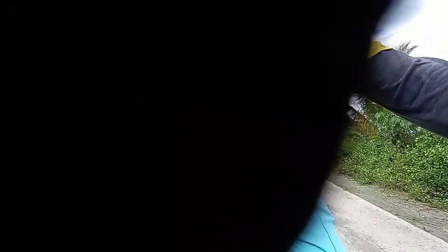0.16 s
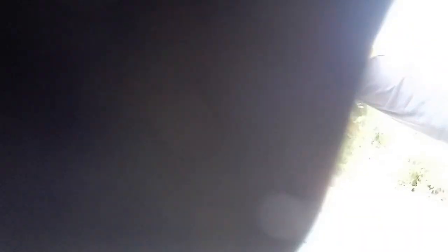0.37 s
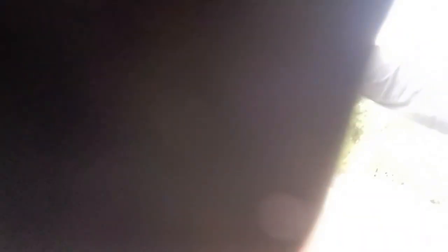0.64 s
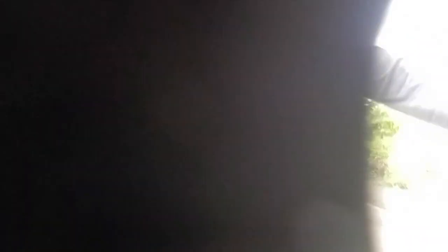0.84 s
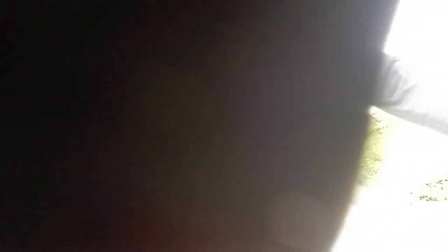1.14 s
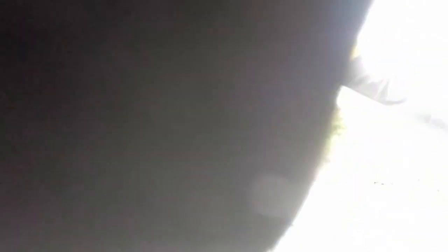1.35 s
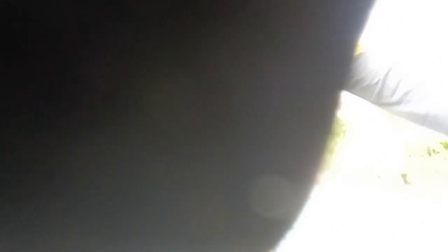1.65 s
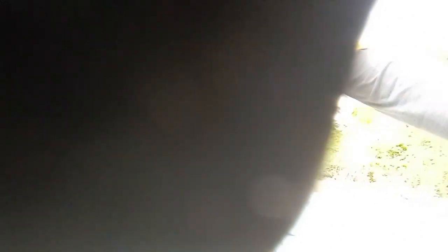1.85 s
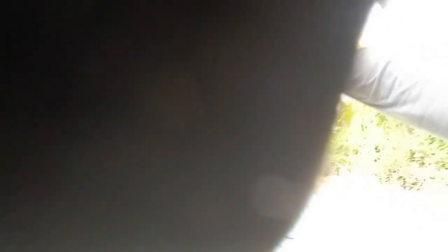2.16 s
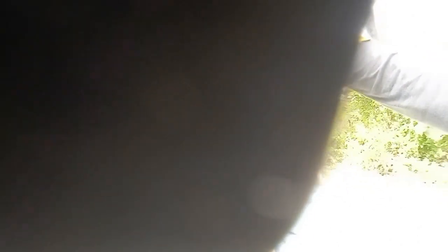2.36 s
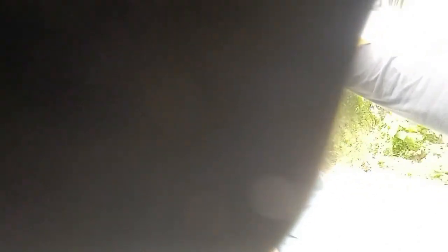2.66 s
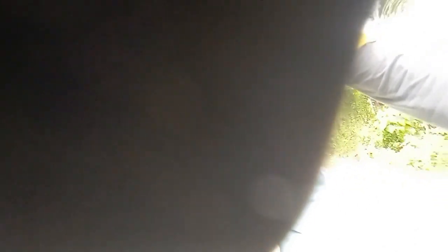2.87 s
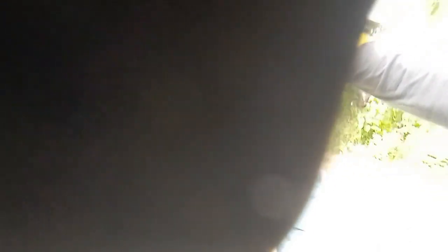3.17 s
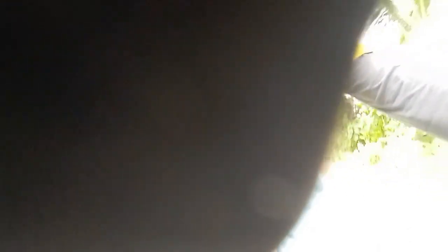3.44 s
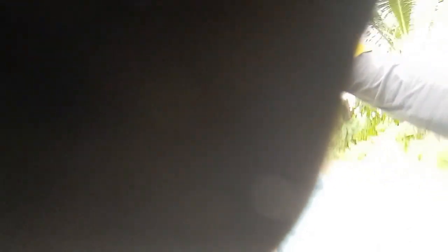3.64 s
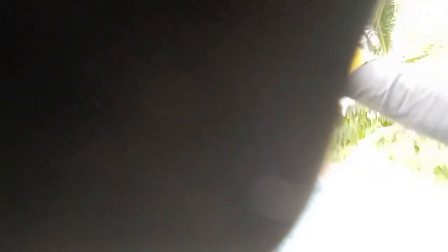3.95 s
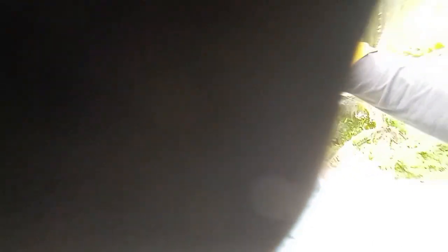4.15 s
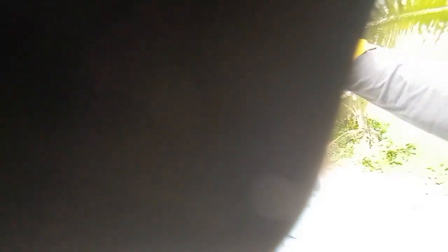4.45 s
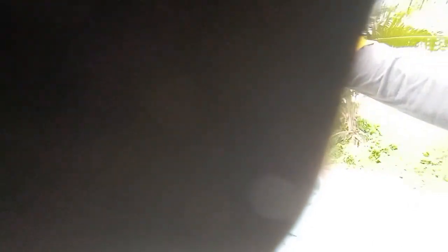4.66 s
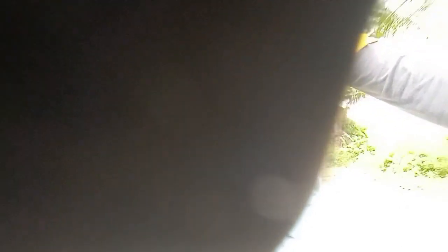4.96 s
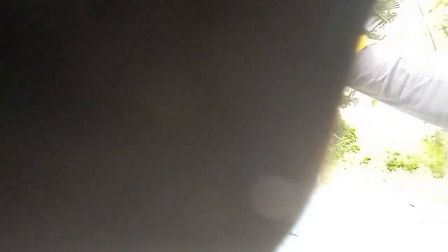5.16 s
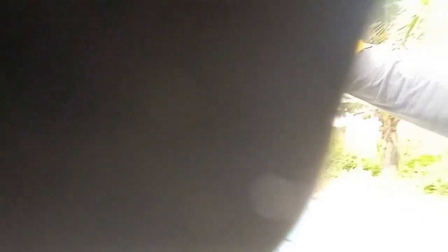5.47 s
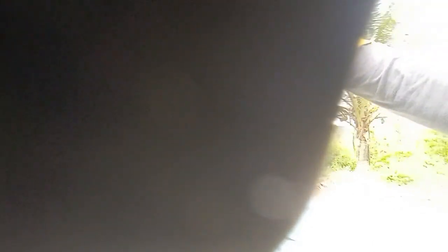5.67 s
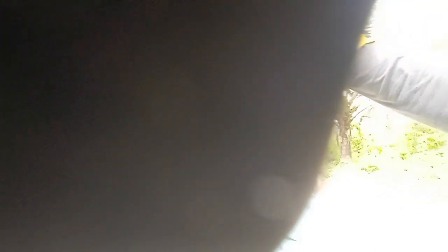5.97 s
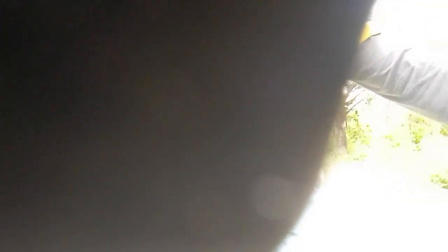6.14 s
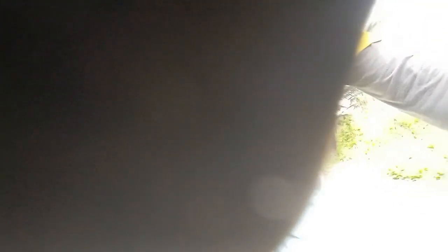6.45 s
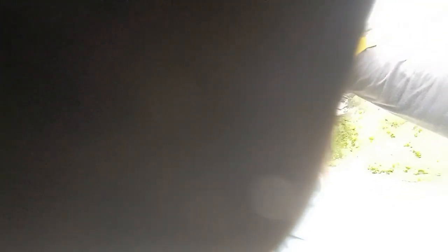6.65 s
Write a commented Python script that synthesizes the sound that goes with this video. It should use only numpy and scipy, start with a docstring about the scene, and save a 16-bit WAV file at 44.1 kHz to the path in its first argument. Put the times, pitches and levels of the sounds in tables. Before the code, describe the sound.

Close, dry handling noise dominates: sharp snaps and gritty chafing of fingers on a camera case. Beneath it a coasting bicycle ticks rapidly, slightly speeding up then slowing, with tyre roll, a humming drone and soft low wind puffs. After the rubbing lets go, a brief hollow swish passes and the quiet clicking continues outdoors.

```python
"""Coasting bicycle, heard from the handlebar

A bicycle coasts along a concrete road, speeding up and slowing, with a camera held at the handlebar.
The freewheel pawl ticks over worn teeth: noise bursts through ringing filters, timed by the wheel speed.
The tyres hiss and roll as coloured noise, and the ride makes the camera case drone in a narrow band.
A hand chafes (dense tiny snaps) and crackles (short wavelets) on the case; wind puffs are low noise.
One soft thump and one hollow swish of gliding resonances pass by."""
import sys
import numpy as np
from scipy import signal
from scipy.fft import rfft, irfft
from scipy.io import wavfile
from scipy.ndimage import uniform_filter1d

SR = 44100
rng = np.random.default_rng(int(sys.argv[2]) if len(sys.argv) > 2 else 0)


def transcribe(signal):
    """Save signal, clipped to [-1, 1], as a 16-bit WAV file at the path in sys.argv[1]."""
    frames = np.atleast_2d(signal).T
    limited = np.clip(frames, -1, 1)
    pcm = np.round(limited * 32767).astype(np.int16)
    wavfile.write(sys.argv[1], SR, pcm)


N = 300321
T = np.arange(N) / SR  # seconds
CUTOFF_HZ = 16300
FIRST_DROP_TEETH = .973  # teeth travelled before the first tick
RUB_PEAK_SHARE = .3  # how far into a slip it is loudest

# Levels in the tables are before the trims and chance that the functions add.
# Spectra are relative: each is scaled to unit energy or rms before use.

# Steady chafing of the hand, which tightens and then lets go. Each row: time in seconds, level in dB.
CHAFE_LEVEL = [(0, -51), (.55, -49), (1.05, -48.5), (1.35, -44), (2.1, -44.5), (2.72, -46.5), (3.0, -44.5),
               (3.25, -35.5), (3.7, -35.5), (4.08, -33), (4.45, -38), (5.04, -40.5), (5.1, -52),
               (5.36, -60), (5.7, -58), (6.08, -69), (6.81, -65.5)]
# Single slips of the hand. Each row: start in seconds, length in seconds, level in dB.
RUBS = [(1.3, 0.089, -43), (3.03, .07, -42), (3.11, .06, -37), (3.21, .26, -30.5), (3.5, .06, -32.5),
        (4.68, .09, -33), (5.13, .11, -39.5), (5.24, .09, -43.5), (5.39, 0.17, -42), (5.54, .15, -36),
        (5.75, .11, -49), (5.865, .14, -39)]
# Spectrum of the chafing. Each row: frequency in Hz, density in dB per Hz.
CHAFE_COLOUR = [(470, -35), (800, -19.5), (940, -21), (1070, -1.5), (1200, -7.5), (1345, 3.5), (1520, -4.5),
                (1950, -5), (2350, -1.5), (2680, 2.5), (3200, -3.5), (3840, -1), (4400, -3), (4900, -9.5),
                (6000, -12), (7800, -18.5), (9500, -40), (12000, -31), (16000, -43)]
# How much the rustle and the rolling swirl in colour. Each row: time in seconds, depth in dB.
SWIRL_DEPTH = [(0, 3), (2.8, 1.5), (3.3, 1), (4.7, 2), (5.2, 3), (6, 8), (6.2, 6), (6.8, 5)]

# Rolling noise of the tyres on the changing concrete. Each row: time in seconds, level in dB.
ROLL_LEVEL = [(0, -57.5), (.26, -63), (.42, -56), (.52, -57), (.85, -55), (1.08, -59.5), (1.38, -50.5),
              (1.7, -53.5), (2.65, -49), (3.3, -50), (3.48, -50), (4.05, -50), (4.9, -51), (5.02, -61),
              (5.18, -58), (5.7, -59), (6.3, -62), (6.81, -71)]
# Rough patches of road. Each row: start in seconds, length in seconds, level in dB.
JOLTS = [(0.02, 0.19, -52), (.67, 0.12, -47), (.95, .07, -52), (2.49, 0.1, -48), (4.0, 0.073, -44),
         (4.56, .05, -47), (4.69, 0.1, -50.5), (5.42, 0.065, -57), (5.59, 0.075, -48), (5.77, .07, -47.5),
         (5.98, 0.088, -50.5)]
# The case's drone. Each row: time in seconds, level in dB.
DRONE_LEVEL = [(0, -52.5), (.55, -56.5), (.88, -62), (1.14, -51), (1.45, -48), (1.75, -52), (2.65, -44.5),
               (3.15, -49), (3.35, -54), (4.05, -49), (4.95, -51), (5.09, -61), (5.3, -47), (5.7, -52.5),
               (5.92, -72), (6.3, -59), (6.6, -76), (6.81, -59)]
# Spectra of the rolling and of the tyre hiss. Each row: frequency in Hz, density in dB per Hz.
ROLL_COLOUR = [(90, -30), (150, -3.5), (200, -7.5), (255, 7.5), (300, 1.5), (400, 1.5), (450, 0),
               (500, 3.5), (570, 0), (667, 6), (730, -8), (794, 3), (930, -10), (1100, -4), (1350, 4),
               (1800, -28)]
TYRE_COLOUR = [(30, -25), (120, -6), (300, 0), (500, -12), (950, -12), (1200, 3), (1350, 3), (1550, 5),
               (2700, -3), (4500, -35), (6600, 10), (9500, -42), (12000, -3), (14600, 4.5), (16000, -34)]

# Puffs of wind at the microphone. Each row: start in seconds, length in seconds, level in dB.
GUSTS = [(0.73, 0.081, -55), (1.092, 0.033, -54), (1.31, 0.07, -47), (2.377, 0.053, -48),
         (2.47, 0.09, -51.5), (3.038, 0.035, -51), (3.096, 0.049, -56), (3.149, 0.033, -54),
         (3.52, 0.125, -50), (3.678, 0.1, -47.5), (3.855, 0.071, -53), (4.419, 0.12, -50.5),
         (4.745, 0.067, -51), (5.014, 0.092, -54), (5.174, 0.083, -48.5), (5.299, 0.043, -51),
         (5.389, 0.13, -53), (5.513, 0.17, -48), (5.72, 0.047, -51), (5.858, 0.054, -52),
         (6.16, 0.12, -51.5), (6.35, 0.055, -51)]
# Spectrum of the wind. Each row: frequency in Hz, density in dB per Hz.
WIND_COLOUR = [(15, -15), (35, -22), (55, -3.5), (72, 5), (100, 0.5), (150, -9.5), (250, -24), (500, -34)]

# Wheel speed. Each row: time in seconds, teeth passing per second.
TOOTH_RATE = [(0.0, 32.066), (0.5, 32.748), (1.0, 34.439), (1.5, 36.199), (2.1, 37.332), (2.7, 39.229),
              (3.3, 39.976), (3.9, 39.986), (4.5, 38.574), (5.2, 37.818), (5.8, 36.168), (6.3, 34.62),
              (6.81, 33.289)]
# One turn of the 20-tooth ratchet, each tooth worn differently. Each row: high ring in dB, low ring in dB.
TOOTH_WEAR = [(1.5, 0), (-0.7, -1), (0.5, 2.5), (-0.3, -1), (0, 1.0), (2, 0.0), (-0.9, 0), (1, 1.5),
              (0.2, 2.5), (-0.7, -1), (0, -1.5), (-1.5, 2), (0.5, 0), (0.2, 1), (1.5, -1), (1, -0.3),
              (-0.5, 0.5), (2.5, 2.5), (1, 1.5), (0.5, -2.5)]
# Ticks where the pawl drops hard. Each row: time in seconds, force in dB over a usual tick.
HARD_TICKS = [(0.584, 6), (0.882, 4), (0.912, 3), (1.057, 5.5), (1.086, 5), (1.143, 7), (1.314, 4),
              (1.646, 6.8), (1.701, 9), (2.528, 5), (2.707, 5.4), (2.784, 6), (3.263, 5), (3.288, 6),
              (3.538, 7.5), (3.588, 6.5), (4.039, 4.9), (4.293, 5.4), (6.31, 3), (6.339, 6), (6.484, 5),
              (6.721, 4.1), (6.781, 6)]
# Spectra of the pawl's low ring, its high ring and its low and high squeaks as it slides up a tooth.
# Each row: frequency in Hz, density in dB per Hz.
PAWL_LOW = [(4000, -62), (5500, -31), (5950, -5.5), (6170, -19), (6380, -0.5), (6560, 2.5), (6850, -3.5),
            (7200, -12), (7520, -14), (7850, -16.5), (8500, -19.5), (9000, -27), (9500, -61), (11500, -30)]
PAWL_HIGH = [(9500, -30.5), (11400, -46), (12200, -23), (12850, -5.5), (13600, -8.5), (14350, 6.5),
             (14750, 2.5), (15200, -7), (15700, -16), (16100, -59), (16600, -45)]
PAWL_SLIDE = [(900, -38), (1350, -19), (1750, -5), (2000, -9), (2120, 8.5), (2270, -13.5), (2450, -21),
              (3500, -39), (6500, -29), (9000, -52)]
PAWL_SQUEAK = [(2500, -20.5), (3800, -13), (4350, -4), (4500, -7), (4720, 2.5), (4980, -20), (5220, -1),
               (5500, -12.5), (6500, -13), (9000, -49)]
# How dry the pawl slides. Each row: time in seconds, low squeak in dB, high squeak in dB.
DRYNESS = [(0, -48.5, -45), (.9, -46, -45.5), (1.3, -45, -44), (2.6, -46, -47), (5.6, -50.5, -48.5),
           (6.0, -59.5, -62), (6.81, -60, -67)]
# Short runs of teeth that squeal.
# Each row: start in seconds, length in seconds, low squeak in dB, high squeak in dB.
SQUEALS = [(.17, .03, -38, -46), (.44, .16, -43, -45), (1.04, .12, -41.5, -43.5), (5.76, .08, -46.5, -58),
           (6.33, .08, -46, -69), (6.5, .08, -67, -54.5), (6.615, .03, -47, -64)]

# Loud cracks of the grip on the case. Each row: time in seconds, peak in dB, nominal brightness in Hz.
CRACKS = [(0.1376, -6.5, 5200), (0.5846, -18, 3100), (1.1305, -18.5, 3680), (1.4789, -11.5, 3100),
          (1.8648, -16, 4500), (1.8692, -10, 2710), (1.873, -13, 3560), (2.4397, -14.5, 4060),
          (2.4548, -14.5, 3300), (2.5096, -19.5, 1980), (2.8438, -15.5, 3900), (3.1358, -12, 3320),
          (3.2648, -9.5, 3030), (3.3358, -9.5, 3220), (3.3837, -10.5, 4000), (3.5127, -11.5, 3750),
          (3.6601, -14, 3200), (3.7768, -6, 2870), (3.8508, -10, 3160), (4.4219, -14.5, 4330),
          (4.5492, -9, 3620), (4.695, -8.5, 3700), (4.7177, -17, 3600), (4.9245, -21, 4470),
          (5.0403, -21, 3700), (5.1445, -16, 3560), (5.1779, -26, 3620), (5.2853, -22, 4120),
          (5.398, -20, 3100), (5.583, -21.5, 3620), (5.6585, -15, 4370), (5.8768, -21.5, 3370),
          (6.7542, -31.5, 4500)]
# Duller knocks on the case. Each row: time in seconds, peak in dB.
KNOCKS = [(1.009, -26.5), (1.869, -21), (2.508, -25), (3.309, -24.5), (3.511, -30), (3.776, -30),
          (3.961, -22.5), (4.573, -21), (4.692, -29)]
# Case resonances. Each row: nominal frequency in Hz, level in dB, time to fall 60 dB in seconds.
CASE_MODES = [(341, -42, .12), (686, -43, 0.038), (840, -17, 0.033), (1120, -5, 0.038), (1330, -0.5, 0.046),
              (1850, 2.5, 0.0041), (2560, 6, 0.013)]

# A short hollow swish.
# Each row: time in seconds, level in dB, lower resonance in Hz, upper resonance in Hz.
SWISH = [(5.85, -78, 520, 1397), (5.89, -58, 567, 1370), (5.95, -43.5, 680, 1310), (6.02, -58, 770, 1216),
         (6.06, -61, 660, 1190), (6.1, -80, 680, 1220)]


def amp(db):
    """Decibels to gain."""
    return 10 ** (np.asarray(db) / 20)


def unit(x):
    """Scales to rms 1."""
    return x / np.sqrt(np.mean(x ** 2) + 1e-20)


def curve(rows, axis=1):
    """One column of a table, joined by lines in time."""
    rows = np.asarray(rows)
    return np.interp(T, rows[:, 0], rows[:, axis])


def add(mix, s, sound):
    """Mixes a sound in at time s."""
    part = mix[max(round(s * SR), 0):][:len(sound)]
    part += sound[:len(part)]


def response(points, size=4096):
    """Causal (minimum-phase) impulse response of a spectrum, energy 1."""
    hz, db = np.transpose(points)
    bins_hz = abs(np.fft.fftfreq(size, 1 / SR)) + 1
    log_gain = np.log(amp(np.interp(np.log(bins_hz), np.log(hz), db)))
    ring = np.fft.ifft(np.exp(np.conj(signal.hilbert(log_gain)))).real[:size // 2]
    return ring / np.linalg.norm(ring)


def coloured(x, points):
    """Gives x a spectrum, at rms 1."""
    return unit(signal.oaconvolve(x, response(points))[:N])


def wander(hz):
    """Slow chance up to a rate, rms 1."""
    spectrum = rfft(rng.standard_normal(N))
    return unit(irfft(spectrum * (np.fft.rfftfreq(N, 1 / SR) < hz), N))


def swells(rows, peak_share):
    """Gain over time of (start, length, dB) events, each one smooth rise and fall."""
    gain = np.zeros(N)
    for start, length, db in rows:
        top = start + length * peak_share
        phase = np.interp(T, [start, top, start + length], [0, np.pi / 2, np.pi])
        gain += amp(db) * np.sin(phase)
    return gain


def swirl(x, span_hz=260, span_s=0.043, size=1024):
    """Patches of the spectrum swell and fade."""
    hop = size // 4
    z = signal.stft(x, nperseg=size, noverlap=size - hop)[2]
    bins = max(round(span_hz * size / SR), 1)
    frames = max(round(span_s * SR / hop), 1)
    field = rng.standard_normal(z.shape)
    for _ in range(2):
        field = uniform_filter1d(field, bins, axis=0)
        field = uniform_filter1d(field, frames, axis=1)
    depth_db = np.interp(np.linspace(0, N / SR, z.shape[1]), *np.transpose(SWIRL_DEPTH))
    gain = amp(depth_db * np.minimum(unit(field), 2))
    gain /= np.sqrt(np.mean(gain ** 2, axis=0))  # colour moves, mean power gain does not
    return signal.istft(z * gain, nperseg=size, noverlap=size - hop)[1][:N]


def whistle(hz, width_hz):
    """Noise in a narrow resonance that may move, rms 1."""
    r = np.exp(-np.pi * width_hz / SR)
    noise = rng.standard_normal(N) + 1j * rng.standard_normal(N)
    fuzz = signal.lfilter([1], [1, -2 * r, r * r], noise)
    carrier = np.exp(2j * np.pi * np.cumsum(hz * np.ones(N)) / SR)
    return unit((fuzz * carrier).real)


def grip_db():
    """How hard the hand chafes: its steady hold plus the single slips."""
    return 20 * np.log10(np.hypot(amp(curve(CHAFE_LEVEL)), swells(RUBS, RUB_PEAK_SHARE)))


def chafing():
    """Skin slipping on the case: countless tiny uneven snaps, each with a brief rasp, over a fine hiss."""
    grains_per_s, size_db, largest = 1700, 4.5, 3.4  # size_db times a chance size, capped at largest
    rasp_db, rasp_decay_s, hiss_gain = -22, 0.0034, 0.35
    bite_per_db, bite_hz = 0.023, 1900

    struck = rng.random(N) < grains_per_s / SR
    sizes = amp(size_db * np.minimum(rng.exponential(1, N), largest))
    snaps = struck * sizes * rng.choice([-1, 1], N)
    rasp_power = signal.lfilter([1], [1, -np.exp(-2 / (rasp_decay_s * SR))], snaps ** 2)
    rasp = np.sqrt(rasp_power) * rng.standard_normal(N)
    grains = unit(snaps + amp(rasp_db) * rasp)
    hiss = hiss_gain * rng.standard_normal(N)
    flutter = amp(0.62 * wander(45))
    rustle = swirl(coloured((grains + hiss) * flutter, CHAFE_COLOUR))

    # a firm grip sounds crisp, a light one duller
    pressure_db = grip_db() + 0.96 * wander(10)
    dullness = np.clip(bite_per_db * (np.median(pressure_db) - pressure_db), -1, 1)
    lows = signal.sosfiltfilt(signal.butter(2, bite_hz, fs=SR, output="sos"), rustle)
    return amp(pressure_db) * (rustle + dullness * lows)


def road():
    """Tyres hiss and roll on concrete; vibration keeps the case droning, and rough patches swell roll and drone."""
    roll_db, drone_db, drone_jolt_db, tyre_db = 0.5, -2.0, -2, -56
    drone_hz, drone_width_hz = 333, 30

    jolts = swells(JOLTS, peak_share=0.46)
    rolling = np.hypot(amp(curve(ROLL_LEVEL) + 2.0 * wander(9)), jolts)
    rumble = swirl(coloured(rng.standard_normal(N), ROLL_COLOUR), span_hz=130)
    roll = amp(roll_db) * rolling * rumble
    shaking = np.hypot(amp(curve(DRONE_LEVEL) + drone_db), amp(drone_jolt_db) * jolts)
    drone = shaking * whistle(drone_hz, drone_width_hz)
    hiss = amp(tyre_db + 0.5 * wander(7.5)) * coloured(rng.standard_normal(N), TYRE_COLOUR)
    return roll + drone + hiss


def wind():
    """A light headwind grows with speed; eddies bump the microphone port in soft, low puffs."""
    gust_db, breeze_db, speed_power = 1.0, -69.0, 4
    speed = curve(TOOTH_RATE)
    breeze = amp(breeze_db + 3.0 * wander(8)) * (speed / speed.mean()) ** speed_power
    strength = np.hypot(breeze, amp(gust_db) * swells(GUSTS, peak_share=0.3))
    return strength * coloured(rng.standard_normal(N), WIND_COLOUR)


def squeak_levels(s):
    """Low and high squeak (dB) of the tooth that passes at time s."""
    for start, length, low_db, high_db in SQUEALS:
        if start <= s <= start + length:
            return low_db, high_db
    when, low, high = np.transpose(DRYNESS)
    return np.interp(s, when, low), np.interp(s, when, high)


def freewheel(size=2048):
    """At each tooth the pawl slides up, drops and chatters for a few milliseconds; the hub rings on."""
    high_db, low_db, squeak_trim_db = -40.0, -43.0, -2
    force_spread_db, low_spread_db, squeak_spread_db, hub_spread_db = 1.5, 1.3, 2.5, 5.0
    low_follow, hub_follow = 0.085, 0.97  # dB per dB of force
    hub_db, hub_hz, hub_t60 = -53, 14750, 0.14
    # seconds: the contact starts ahead of the tooth, builds up, chatters, then settles
    lead, attack, chatter, settle = 0.0029, 0.0023, 0.0022, 0.0019
    tail_db, tail_s = -20, 0.028
    slide_lead, slide_width = 0.00078, 0.0047  # seconds
    chatter_spread, detune_hz = 0.24, 75
    before, tick_length = .006, .01  # seconds

    passed = np.cumsum(curve(TOOTH_RATE)) / SR
    times = np.interp(np.arange(FIRST_DROP_TEETH, passed[-1]), passed, T)
    high_wear, low_wear = np.array(TOOTH_WEAR)[np.arange(len(times)) % len(TOOTH_WEAR)].T
    chance = rng.standard_normal((len(times), 7))
    force_db = high_wear + force_spread_db * chance[:, 0]
    for s, db in HARD_TICKS:
        force_db[np.argmin(abs(times - s))] = db

    t = np.arange(size) / SR - before
    since = np.maximum(t + lead, 0)
    sliding = np.exp(-abs(t + slide_lead) / slide_width)
    after = np.arange(0, hub_t60, 1 / SR)
    hub_envelope = amp(-60 * after / hub_t60) * np.minimum(after / chatter, 1)
    hub = hub_envelope * np.sin(2 * np.pi * hub_hz * after)
    spectra = (PAWL_HIGH, PAWL_LOW, PAWL_SLIDE, PAWL_SQUEAK)
    rings = [signal.hilbert(response(part, size=1024)) for part in spectra]

    out = np.zeros(N)
    for tooth, (s, force, luck) in enumerate(zip(times, force_db, chance)):
        # the pawl never lands twice alike: it bounces longer or shorter, and rings a little higher or lower
        bounce_time = since * np.exp(chatter_spread * luck[3])
        bouncing = np.exp(-np.maximum(bounce_time - chatter, 0) / settle)
        bouncing = (bouncing + amp(tail_db) * np.exp(-since / tail_s)) * np.minimum(since / attack, 1)
        detune = np.exp(2j * np.pi * detune_hz * luck[4] * t[:len(rings[0])])
        low_squeak, high_squeak = squeak_levels(s)
        levels = (high_db + force,
                  low_db + low_wear[tooth] + low_follow * force + low_spread_db * luck[1],
                  squeak_trim_db + low_squeak + squeak_spread_db * luck[5],
                  squeak_trim_db + high_squeak + squeak_spread_db * luck[6])
        contacts = (bouncing, bouncing, sliding, sliding)
        for contact, ring, db in zip(contacts, rings, levels):
            tick = np.convolve(contact * rng.standard_normal(size), (ring * detune).real)
            # same energy as rms 1 held for tick_length
            tick *= np.sqrt(SR * tick_length) / np.linalg.norm(tick)
            add(out, s - before, amp(db) * tick)
        add(out, s - lead, amp(hub_db + hub_follow * force + hub_spread_db * luck[2]) * hub)
    return out


def small_cracks():
    """Rows (s, peak dB, nominal Hz) of chance snaps: a firmer grip makes more and louder ones."""
    per_s, peak_db, hz = 8, -24, 3600  # at the median grip
    rate_follow, level_follow = .6, 0.49  # dB per dB of grip
    spread_db, hz_spread, count = 3.0, 0.078, 400  # count is the most drawn

    firmness = grip_db()
    firmness = firmness - np.median(firmness)
    due = np.cumsum(per_s * amp(rate_follow * firmness)) / SR
    turn = np.arange(count) + rng.random(count)
    luck = rng.standard_normal((count, 2))
    times = np.interp(turn, due, T)
    levels = peak_db + level_follow * np.interp(times, T, firmness) + spread_db * luck[:, 0]
    brightness = hz * np.exp(hz_spread * luck[:, 1])
    return np.column_stack([times, levels, brightness])[turn < due[-1]]


def case_ring(size=4096):
    """The case's modes after one blow, each slightly retuned by chance, peak 1."""
    t = np.arange(size) / SR
    ring = np.zeros(size)
    for hz, db, t60 in CASE_MODES:
        mode_hz = hz * rng.uniform(0.87, 1.02)
        ring += amp(db - 60 * t / t60) * np.sin(2 * np.pi * mode_hz * t)
    return ring / abs(ring).max()


def cracks(size=4096):
    """The grip lets go in single snaps of a cycle or two, which shake the case; knocks shake it alone."""
    pitch, cycles = 0.99, 0.55  # factor on the brightness; envelope width in cycles
    ring_db, rasp_db, knock_db = -14, -16, 1.5
    rasp_decay, onset = 0.0024, .001  # seconds

    out = np.zeros(N)
    t = np.arange(size) / SR - onset
    for s, db, hz in [*CRACKS, *small_cracks()]:
        turns = t * hz * pitch
        snap = -np.cos(2 * np.pi * turns) * np.exp(-(turns / cycles) ** 2)
        burst = rng.standard_normal(size) * (t > 0) * np.exp(-abs(t) / rasp_decay)
        rasp = signal.fftconvolve(burst, response(CHAFE_COLOUR, size=512))[:size]
        add(out, s - onset, amp(db) * (snap + amp(rasp_db) * rasp))
        add(out, s, amp(db + ring_db) * case_ring())
    for s, db in KNOCKS:
        add(out, s, amp(db + knock_db) * case_ring())
    return out


def bump(s=2.7, level_db=-36.0, hz=200, rise=0.0052, size=4096):
    """One soft, hollow thump: a low sine that swells for rise seconds and dies away."""
    t = np.arange(size) / SR
    envelope = t / rise * np.exp(1 - t / rise)
    out = np.zeros(N)
    add(out, s, amp(level_db) * envelope * np.sin(2 * np.pi * hz * t))
    return out


def swish():
    """Air swishes through two gliding resonances as the hand eases off."""
    sounding = (T > SWISH[0][0]) & (T < SWISH[-1][0])
    lower = amp(-3) * whistle(curve(SWISH, axis=2), width_hz=50)
    upper = amp(-8) * whistle(curve(SWISH, axis=3), width_hz=130)
    return sounding * amp(curve(SWISH)) * (lower + upper)


def scene():
    """Everything as heard at the handlebar."""
    return (freewheel() + chafing() + cracks() + road() + swish() + wind() + bump())[None]


def record(dry):
    """The camera's band limit: a steep lowpass."""
    lowpass = signal.firwin(511, CUTOFF_HZ, window=("kaiser", 9), fs=SR)
    return signal.oaconvolve(dry, lowpass[None], "same")


dry = scene()
out = record(dry)
transcribe(out)
```